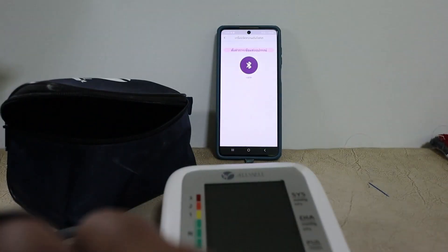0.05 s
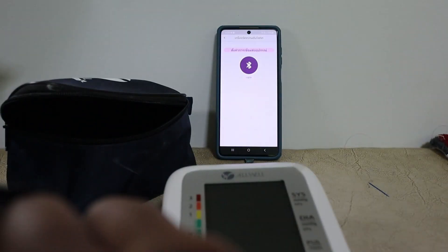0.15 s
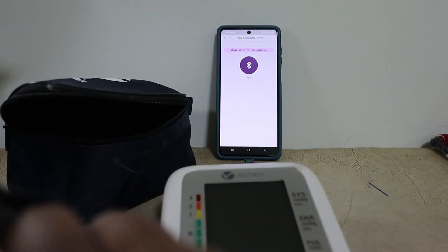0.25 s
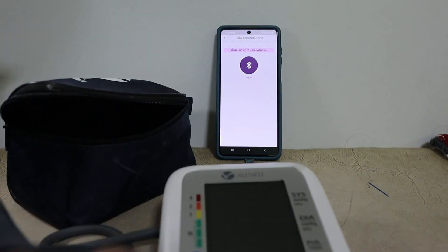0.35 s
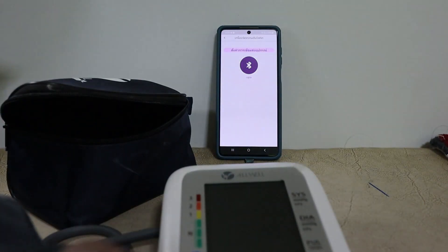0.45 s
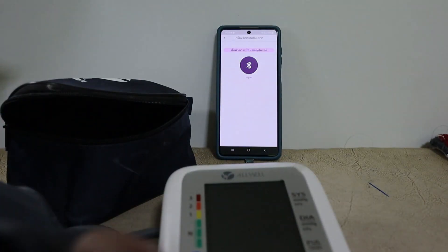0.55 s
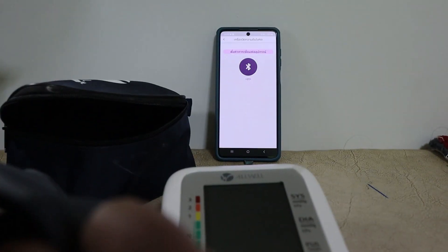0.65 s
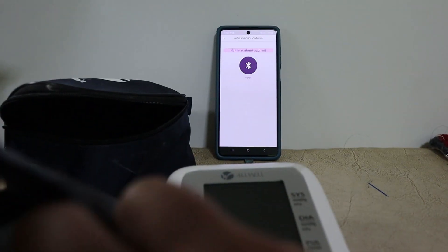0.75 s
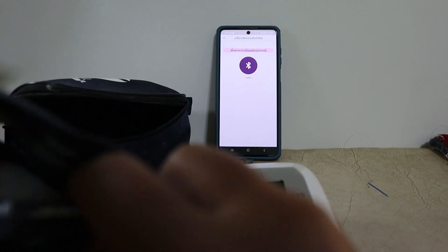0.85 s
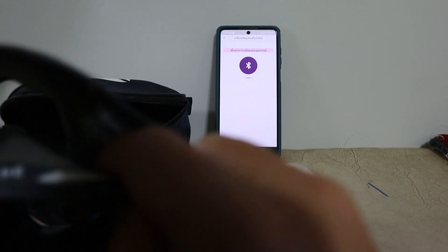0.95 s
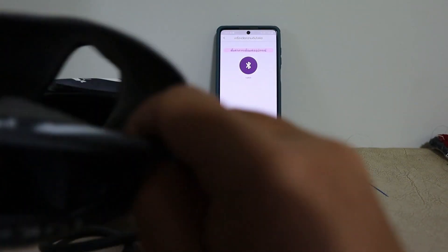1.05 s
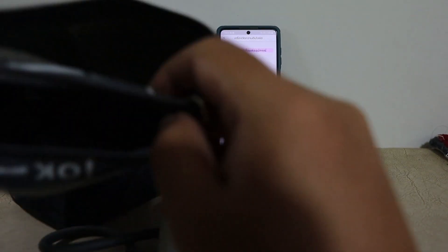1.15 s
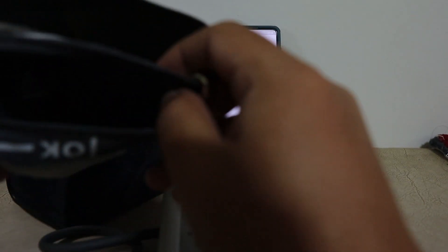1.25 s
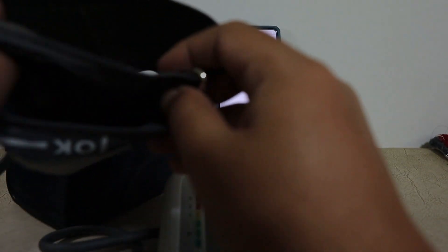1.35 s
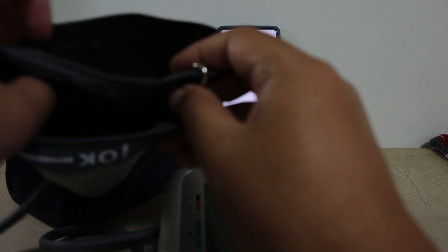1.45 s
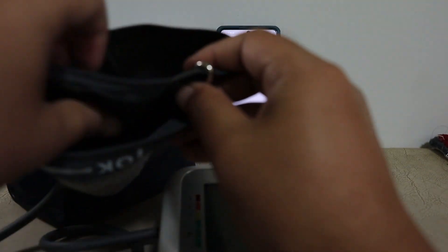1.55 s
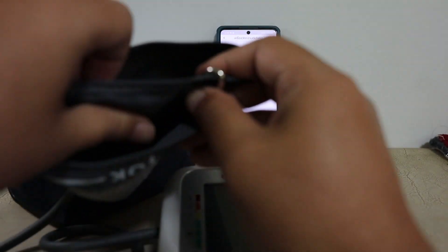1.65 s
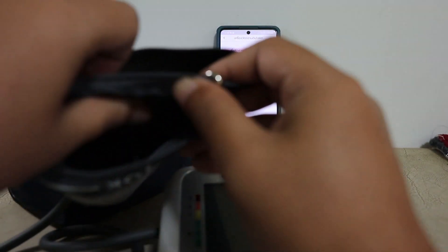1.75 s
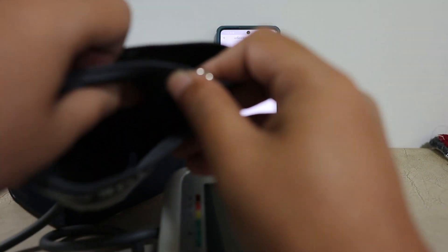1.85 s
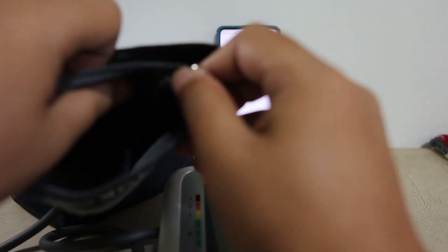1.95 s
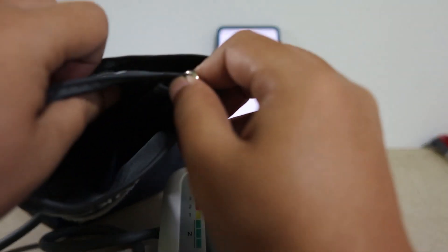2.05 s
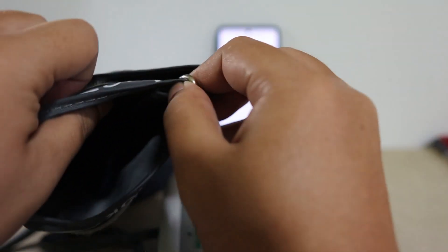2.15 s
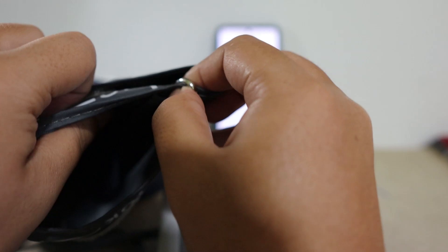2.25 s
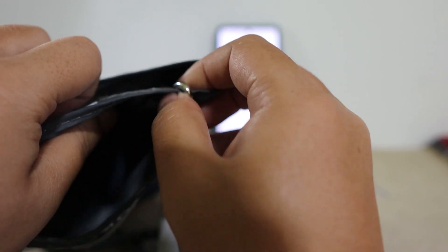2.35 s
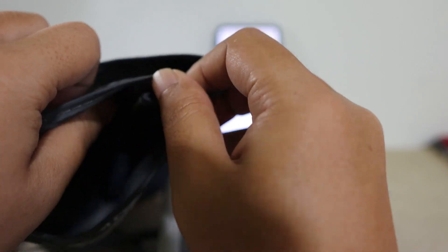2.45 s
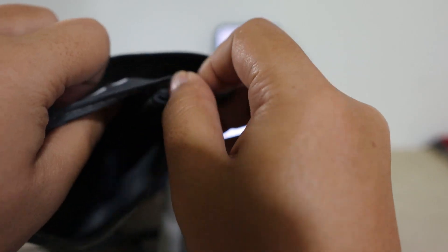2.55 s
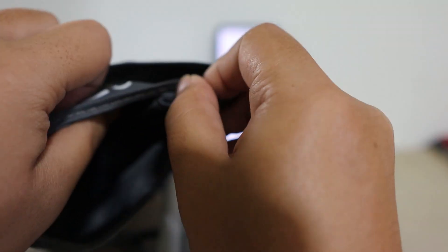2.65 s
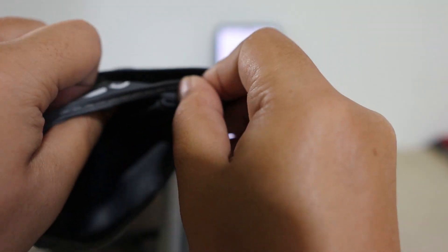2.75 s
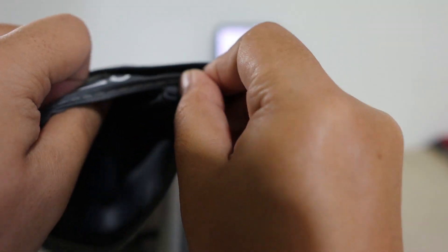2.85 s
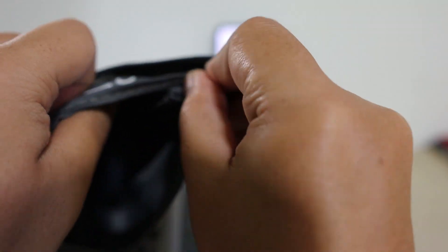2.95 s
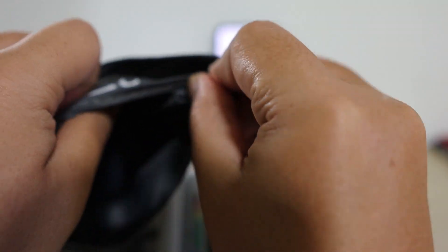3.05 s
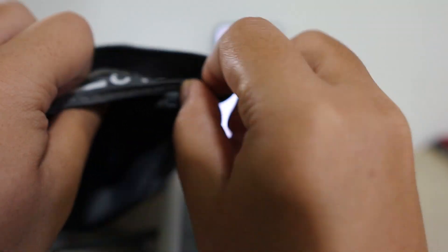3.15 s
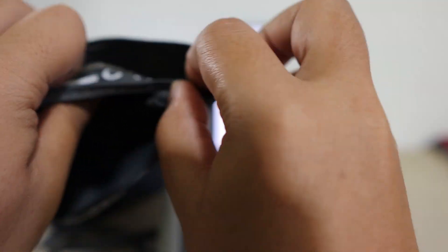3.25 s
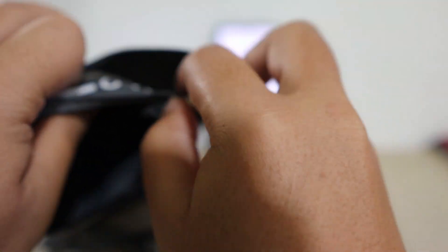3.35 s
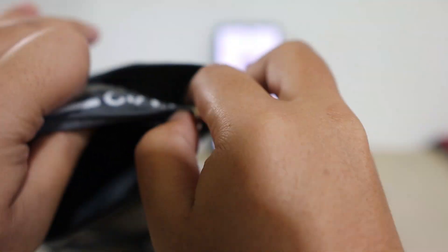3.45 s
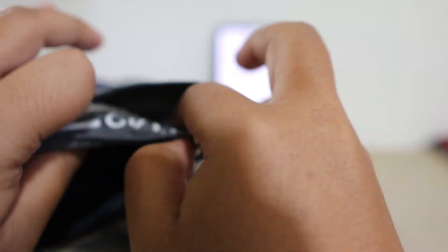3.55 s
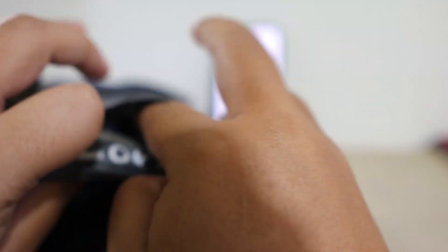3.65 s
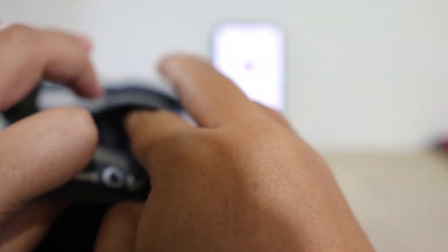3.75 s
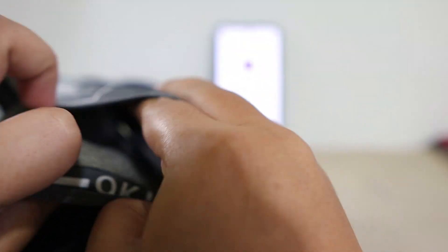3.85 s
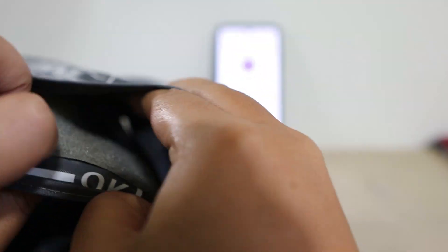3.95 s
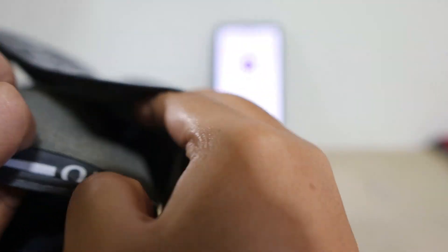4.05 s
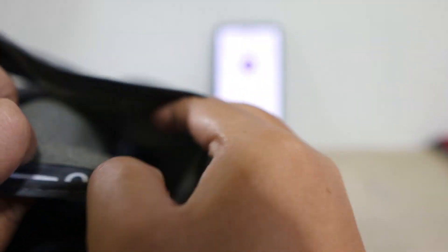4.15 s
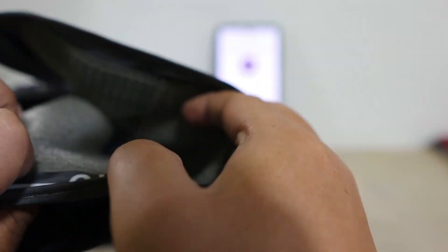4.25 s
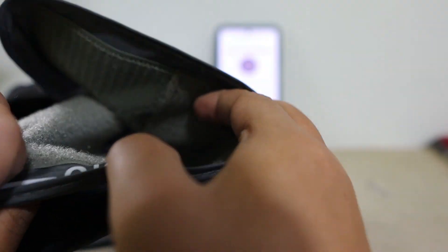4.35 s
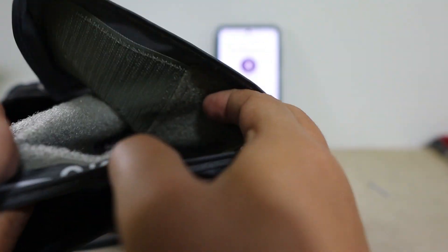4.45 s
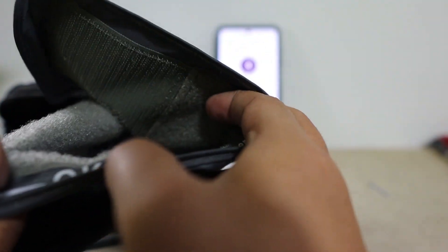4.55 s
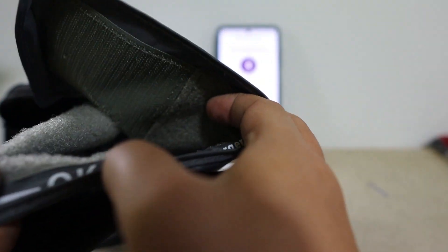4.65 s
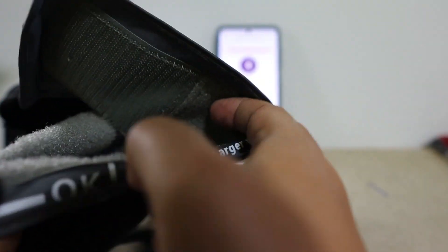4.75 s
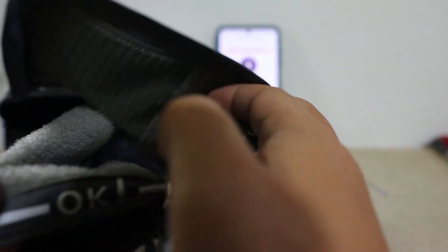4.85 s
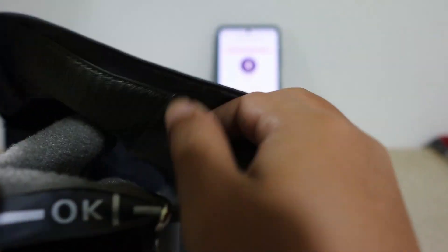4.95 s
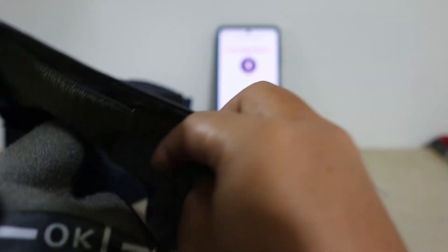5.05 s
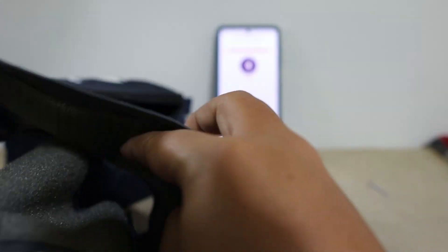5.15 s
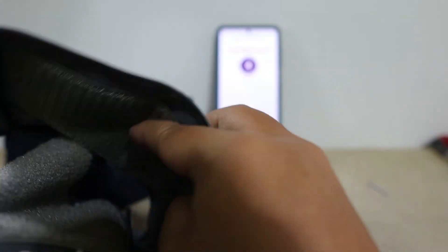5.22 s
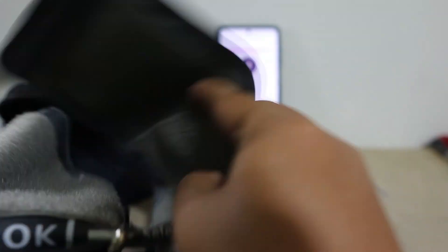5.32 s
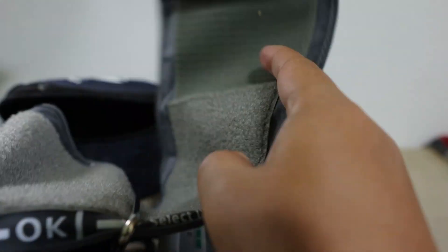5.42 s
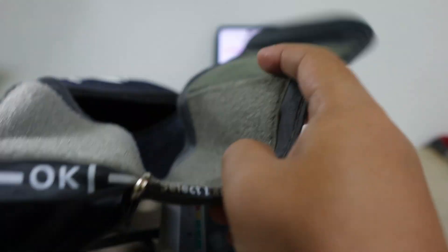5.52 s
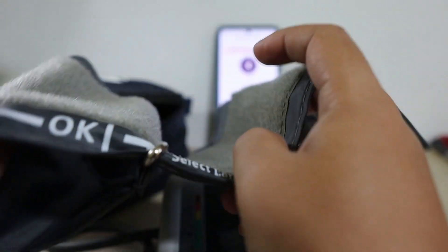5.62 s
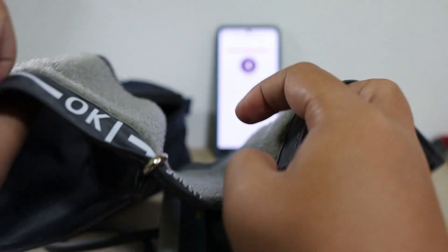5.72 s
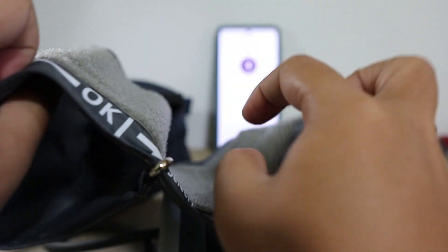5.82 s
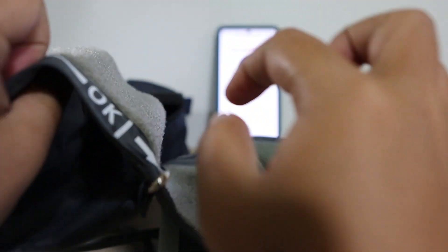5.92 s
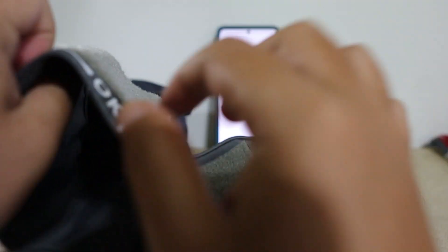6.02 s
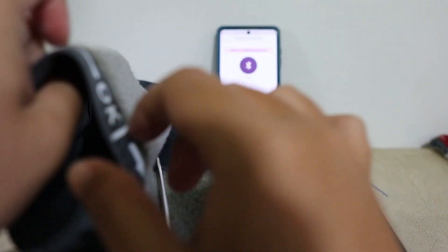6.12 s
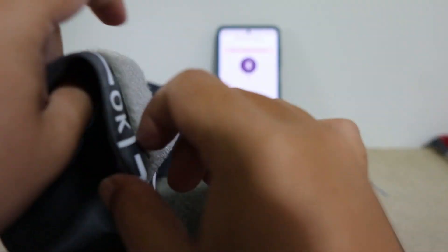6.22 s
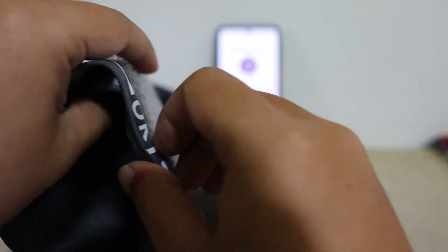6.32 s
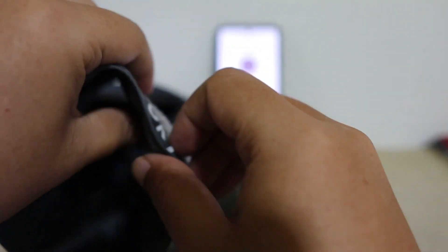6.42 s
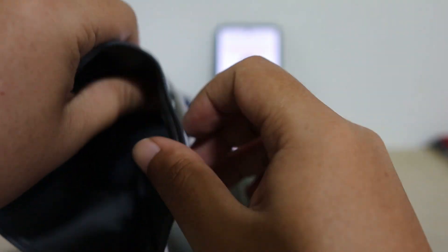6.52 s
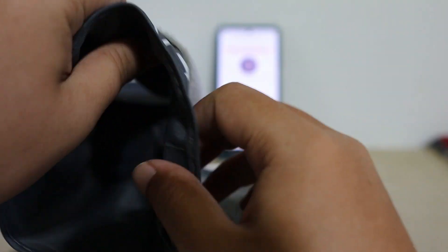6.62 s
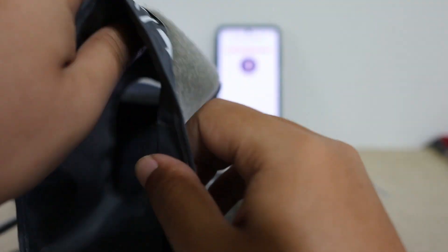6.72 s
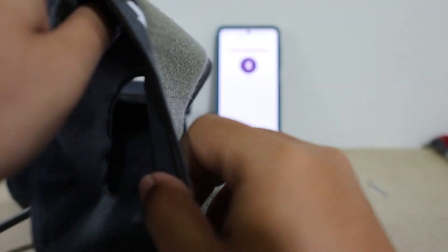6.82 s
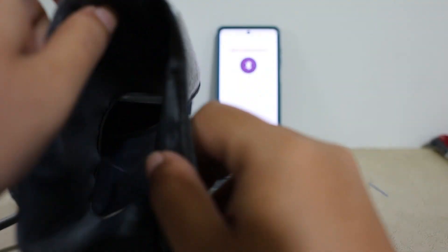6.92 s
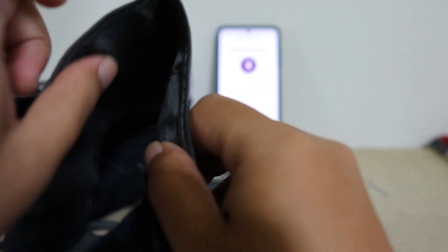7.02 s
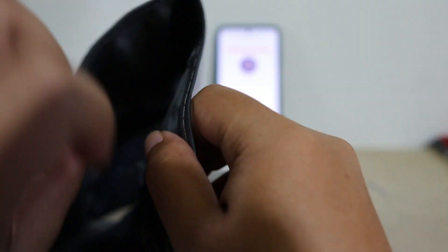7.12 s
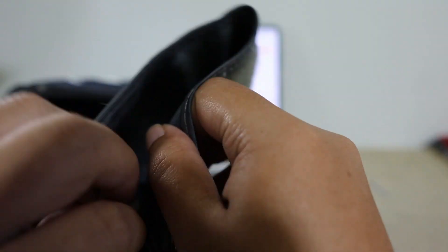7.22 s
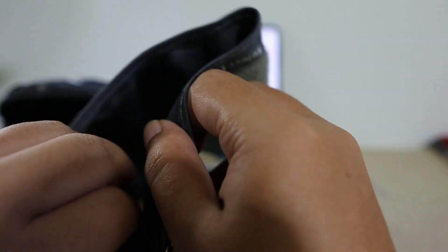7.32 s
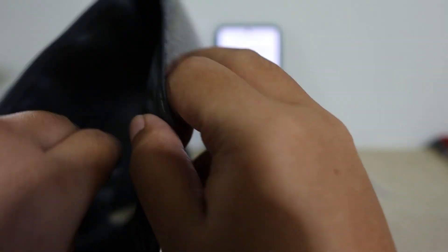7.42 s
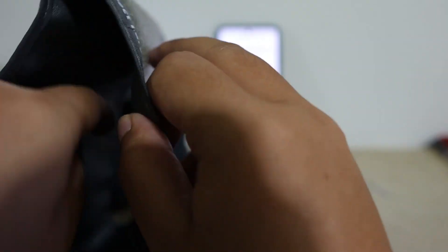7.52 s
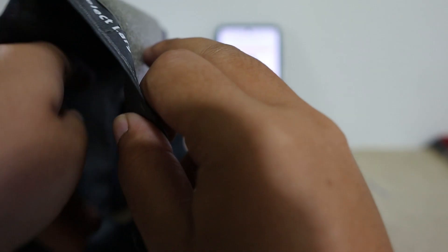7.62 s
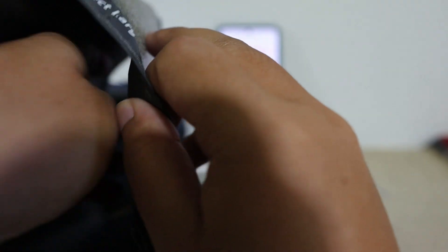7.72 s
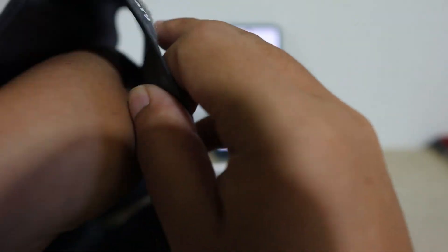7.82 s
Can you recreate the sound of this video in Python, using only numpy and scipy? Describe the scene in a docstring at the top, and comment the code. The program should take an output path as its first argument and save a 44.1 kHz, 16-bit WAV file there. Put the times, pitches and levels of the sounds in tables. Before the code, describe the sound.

Close cloth rustle and light fitting taps in a quiet room, a long crackling strap rip, a last sharp rip, then softer rustling.

```python
"""A quiet room, close to a small camera microphone: hands turn a padded fabric cuff.
Cloth rustles as noise and random grains under swelling strokes; fittings knock as decaying sines with noisy ticks.
The hook-and-loop strap tears open in short crackling bursts and single hooks snag as brief rings.
A thin bundle of sines glides once over low filtered-noise rumble and a fading two-band drone."""
import sys
import numpy as np
from scipy import signal
from scipy.fft import rfft, irfft
from scipy.io import wavfile
from scipy.ndimage import uniform_filter1d

SR = 44100
rng = np.random.default_rng(int(sys.argv[2]) if len(sys.argv) > 2 else 0)


def invert_db(level):
    """Linear amplitude ratio for a level in decibels (20 dB per decade), elementwise."""
    return 10 ** (np.asarray(level, dtype=float) / 20)


def wav_record(signal):
    """Record a signal, one row per channel, as 16-bit PCM in the file named by sys.argv[1]."""
    frames = np.transpose(np.atleast_2d(signal))
    bounded = np.clip(frames, -1, 1)
    # unit amplitude maps onto the largest positive 16-bit level
    quanta = np.round(bounded * 32767).astype(np.int16)
    wavfile.write(sys.argv[1], SR, quanta)


N = 347287

# edges between the bands that folds of cloth shade separately: (frequency [Hz])
FOLD_EDGES = (450, 850, 1400, 2500, 3400, 4600, 8000)


def rms_one(x):
    """Power normalisation: scale to rms 1."""
    return x / np.sqrt(np.mean(x ** 2) + 1e-20)


def in_time(rows):
    """Linear interpolation: columns of a curve table at every sample."""
    s, *columns = np.transpose(rows)
    return [np.interp(np.arange(N) / SR, s, column) for column in columns]


def coloured(x, spectrum):
    """Minimum-phase filtering: folding the cepstrum gives a causal response, here of unit energy."""
    hz, level_db = np.transpose(spectrum)
    grid = np.fft.rfftfreq(8192, 1 / SR) + 1   # +1 Hz keeps the logarithm finite
    log_gain = np.interp(np.log(grid), np.log(hz), level_db) * np.log(10) / 20
    cepstrum = irfft(log_gain)
    cepstrum[1:4096] *= 2
    cepstrum[4097:] = 0
    response = irfft(np.exp(rfft(cepstrum)))[:4096]
    return signal.fftconvolve(x, response / np.linalg.norm(response))[:N]


def half(x, kind):
    """Band splitting: the body ("low") or treble ("high") side of the spectral valley at 2 kHz."""
    return signal.sosfilt(signal.butter(4, 2000, kind, fs=SR, output="sos"), x)


def drift(rate):
    """Band-limited fluctuation: straight lines between normal random knots, rate knots per second."""
    knots = rng.standard_normal(5000)
    return np.interp(np.arange(N) / SR * rate, np.arange(len(knots)), knots)


def grains(per_s, spread_db):
    """Shot noise: random clicks of uneven size and sign, rms 1."""
    sizes = invert_db(spread_db * np.minimum(rng.exponential(1, N), 5))
    sizes = sizes * rng.choice([-1, 1], N)
    return rms_one(sizes * (rng.random(N) < per_s / SR))


def patchy(x, depth_db, rate, edges):
    """Acoustic shading: folds of cloth make each band between the edges swell and sink on its own."""
    below = [signal.sosfiltfilt(signal.butter(3, hz, fs=SR, output="sos"), x) for hz in edges]
    bands = zip([0] + below, below + [x])
    return sum((top - bottom) * invert_db(depth_db * drift(rate)) for bottom, top in bands)


def stroke_levels():
    """Exponential swell and decay: strokes rise and fall evenly in dB, and their powers add."""
    # cloth sliding on cloth: (peak time [s], body level [dB], hiss re body [dB], swell [s], fade [s])
    strokes = [(0.0, -49, -1.5, .05, 0.31), (0.218, -42, 2, 0.054, 0.072), (0.43, -61, 7.5, 0.092, 0.23),
               (0.6, -54, -2.5, 0.14, 0.29), (1.0, -50, 3, 0.1, 0.083), (1.13, -51, 2, 0.02, 0.081),
               (1.259, -42.5, 1.5, 0.12, 0.094), (1.582, -44, -6, 0.13, 0.15), (2.25, -59, -3, 0.97, 0.12),
               (2.55, -56, -6, 0.32, 0.42), (2.93, -51, -5, 0.065, 0.1), (3.22, -54.5, -1, 0.2, 0.12),
               (3.35, -51, 1, 0.11, 0.083), (3.46, -43.5, 0.5, 0.058, 0.079), (3.72, -59, -6.5, 0.98, 0.78),
               (3.92, -48.5, -11, 0.056, 0.2), (4.12, -52, 1.5, 0.31, 0.8), (4.93, -44, -1, 0.52, 0.043),
               (5.058, -50, 0.5, 0.078, 0.02), (5.17, -49.5, -0.5, 0.073, 0.25),
               (5.39, -46, 0.5, 0.11, 0.24), (5.55, -51, -6.5, 0.78, 0.15), (5.84, -53, 1.5, 0.027, 0.16),
               (6.09, -51.5, -6, 0.047, 0.11), (6.26, -61, 7, 0.12, 0.14), (6.73, -51.5, -1, 0.32, 0.35),
               (6.885, -53, 1, 0.13, 0.14), (7.07, -51, -1.5, 0.077, 0.11), (7.46, -50.5, 0, 0.05, 0.23),
               (7.55, -55.5, -3, 0.15, 0.17), (7.76, -50, -3, 0.05, 0.073), (7.83, -58.5, 10, 0.13, 0.34)]
    rest_body_db, rest_hiss_db = -74.5, -73   # cloth creaking in the grip between strokes
    range_db = 15   # gained over the swell, lost over the fade
    t = np.arange(0, N + 64, 64) / SR
    s, body_db, hiss_db, swell, fade = np.transpose(strokes)[:, :, None]
    before_peak = (s - t) / np.maximum(swell, .01)
    after_peak = (t - s) / np.maximum(fade, .01)
    lost_db = range_db * np.maximum(before_peak, after_peak)
    levels = []
    for peak_db, rest_db in ((body_db, rest_body_db), (body_db + hiss_db, rest_hiss_db)):
        power = np.sum(invert_db(peak_db - lost_db) ** 2, axis=0) + invert_db(rest_db) ** 2
        levels.append(np.interp(np.arange(N) / SR, t, 10 * np.log10(power)))
    return levels


def rustle():
    """Friction noise: fibres catch thousands of times a second, hand pressure flutters, stray hooks tick."""
    # colour of the cloth at the microphone: (frequency [Hz], relative power density [dB])
    cloth_colour = [(120, -21.5), (200, -9), (334, -4.5), (456, -2.5), (867, -1), (1060, 2.5),
                    (1500, -15.5), (2300, -17.5), (3400, -11), (6280, -16.5), (7680, -14.5), (12400, -20),
                    (14300, -22), (16000, -39)]
    body_db, hiss_db = stroke_levels()
    flutter = drift(60.)
    fibres = grains(5000., spread_db=4.5) + 0.5 * rng.standard_normal(N)
    stray = uniform_filter1d(np.abs(grains(90.0, spread_db=4.0)), size=70)
    sound = coloured(fibres, cloth_colour)
    body_gain = invert_db(body_db + 1.6 * flutter + 2.8 * drift(35.)) * (1 + 0.28 * stray)
    hiss_gain = invert_db(hiss_db + 1.6 * flutter + 0.8 * drift(90.)) * (1 + 0.4 * stray)
    body = rms_one(half(sound, "low")) * body_gain
    hiss = rms_one(half(sound, "high")) * hiss_gain
    return body + patchy(hiss, depth_db=3.0, rate=12., edges=FOLD_EDGES[3:])


def room_air():
    """Stationary broadband noise: random pressure coloured into a low rumble."""
    # colour of the room air: (frequency [Hz], relative power density [dB])
    air_colour = [(24, -35), (40, 16.5), (64, 0), (220, -6.5), (467, -13), (1070, -13.5), (1760, -22),
                  (3220, -52.5), (16000, -65)]
    air = invert_db(-55.0) * coloured(rng.standard_normal(N), air_colour)
    return signal.sosfilt(signal.butter(8, 39., "high", fs=SR, output="sos"), air)


def drone():
    """Narrow-band resonance: noise through two resonators an octave apart makes a far, unsteady drone."""
    # fading of the drone: (time [s], level of the lower band [dB])
    drone_levels = [(0, -55), (3, -62), (7.87, -70)]
    level_db, = in_time(drone_levels)
    low, octave = [signal.lfilter(*signal.iirpeak(hz, 6, SR), rng.standard_normal(N)) for hz in (69, 138)]
    return invert_db(level_db) * (rms_one(low) + 0.68 * rms_one(octave))


def room(x):
    """Diffuse reverberation: exponentially decaying noise, dull and partly different at each ear."""
    t60_s, level_db, wall_cut_hz = 0.23, -14.5, 6400
    t = np.arange(SR // 2) / SR
    tails = rng.standard_normal((2, len(t))) * invert_db(-60 * t / t60_s) * (t > .004)
    tails = signal.sosfilt(signal.butter(1, [220., wall_cut_hz], "band", fs=SR, output="sos"), tails)
    shared = tails[0] + 0.14 * tails[1] * np.array([[1], [-1]])
    response = shared / np.linalg.norm(tails[0])
    return invert_db(level_db) * signal.fftconvolve(x[None], response, axes=1)[:, :N]


def taps():
    """Impact excitation: a knock at its own pitch rings the padding near 1 kHz, with a tick near 3.5 kHz."""
    # fittings and stiff folds knocking: (time [s], strength [dB], pitch [Hz], tick re strength [dB])
    tap_rows = [(0.025, -42, 600, 21), (0.375, -25.5, 713, -12.5), (0.578, -24.5, 580, -16),
                (0.788, -29, 660, -13.5), (0.8993, -11, 990, -11.5), (1.176, -19.5, 590, -33),
                (1.756, -20, 755, -13), (1.936, -26.5, 820, -27), (2.129, -35, 1030, -14),
                (2.226, -29.5, 950, -10), (2.268, -28.5, 960, -31), (3.049, -34.5, 860, -29),
                (4.8728, 1, 1400, -6.5), (4.8725, -4, 2850, -19), (5.475, -0.5, 546, -5),
                (5.485, -1, 980, -23), (5.822, -39, 1150, 1.5), (6.052, -29, 570, 4),
                (6.106, -24, 587, -16), (6.713, -27.5, 770, -2), (6.715, -32, 1230, -1),
                (6.817, -36, 1300, -16), (6.866, -17, 1340, -18), (7.18, -29, 624, -37),
                (7.539, -30.5, 403, -22), (7.61, -35, 700, -12)]
    out, t = np.zeros(N + SR), np.arange(SR // 8) / SR
    chance = rng.standard_normal((len(tap_rows), len(t)))
    ring = 0.5 * np.sin(2 * np.pi * 1000 * t) * invert_db(-60 * t / 0.019)
    ring = ring + 0.073 * np.sin(2 * np.pi * 1150 * t) * invert_db(-60 * t / 0.062)
    for (s, strength_db, hz, tick_db), noise in zip(tap_rows, chance):
        knock = np.sin(2 * np.pi * hz * t) * invert_db(-60 * t * hz / 4.9)   # higher knocks die sooner
        near = 1 / (1 + ((hz - 1030.) / 150.) ** 2)   # knocks close to its pitch drive the padding hardest
        rise = 1 - np.exp(-t / (0.00059 + 0.0011 * near))
        tick = (np.sin(2 * np.pi * 3350 * t) + 0.9 * noise) * invert_db(-60 * t / 0.0055)
        body = 2.01 * rise * (knock + near * ring)
        at = round(s * SR)
        out[at:at + len(t)] += invert_db(strength_db) * (body + invert_db(tick_db) * half(tick, "high"))
    return signal.sosfilt(signal.butter(2, 6500., fs=SR, output="sos"), out[:N])


def snags():
    """Damped free vibration: single hooks snag with a few milliseconds of thin, high ring and crackle."""
    # hooks snagging: (time [s], level of the ring at its start [dB], pitch [Hz])
    snag_rows = [(0.785, -39.5, 9100), (1.856, -51, 10900), (2.3218, -46, 4160), (2.382, -46, 8930),
                 (2.925, -38, 4670), (3.305, -39, 7990), (3.328, -38, 7000), (3.378, -31, 9000),
                 (3.41, -36, 4970), (5.752, -43, 4320), (6.619, -54.5, 5130), (6.658, -41, 5070),
                 (6.677, -40, 4400), (6.699, -45.5, 4030)]
    t60_s, noise_share = 0.008, 0.66
    out, t = np.zeros(N), np.arange(SR // 40) / SR
    chance = rng.standard_normal((len(snag_rows), len(t)))
    for (s, level_db, hz), noise in zip(snag_rows, chance):
        at = round(s * SR)
        ring = np.sin(2 * np.pi * hz * t) + noise_share * half(noise, "high")
        out[at:at + len(t)] += invert_db(level_db - 60 * t / t60_s) * ring
    return signal.sosfilt(signal.butter(2, 11000., fs=SR, output="sos"), out)


def whine():
    """Frequency modulation: wavering strands glide together, and the top one takes over at the end."""
    # the glide: (time [s], main strand frequency [Hz], main strand level [dB], top strand level [dB])
    glide = [(3.04, 9000, -81, -90), (3.07, 10200, -67, -91), (3.1, 10900, -67, -82),
             (3.201, 11250, -63, -84), (3.28, 11700, -58, -79), (3.325, 11000, -63, -61),
             (3.43, 10750, -76, -57)]
    hz, main_db, top_db = in_time(glide)
    t = np.arange(N) / SR
    gate = np.clip(np.minimum(t - glide[0][0], glide[-1][0] - t) / .01, 0, 1)   # 10 ms ramps
    phase = 2 * np.pi * np.cumsum(hz * (1 + 0.004 * drift(70.))) / SR
    out = 0
    # frequency ratio and level of each strand
    for ratio, level_db in ((1, main_db), (.925, main_db - 8.), (.78, main_db - 9.), (1.125, top_db)):
        out = out + invert_db(level_db + 3.0 * drift(90.0)) * np.sin(ratio * phase)
    return gate * out


def small_runs(count):
    """Random point process: small runs of hooks strewn over the long pull, as (s, body dB, length ms)."""
    # strength of the small runs: (time [s], mean body level [dB])
    pull = [(3.921, -43.5), (4.151, -32.5), (4.22, -27.5), (4.26, -39.5), (4.45, -36.5), (4.58, -31.5),
            (4.7, -28), (4.929, -32.5)]
    mean_ms, spread_db = 4.5, 3.0
    when, size, length = rng.random((count, 3)).T
    pull_s, pull_db = np.transpose(pull)
    s = pull_s[0] + when * (pull_s[-1] - pull_s[0])
    body_db = np.interp(s, pull_s, pull_db) + spread_db * (2 * size - 1)
    return list(zip(s, body_db, mean_ms * (.5 + length)))


def strap():
    """Stick-slip release: runs of hooks start at once, crackle and stop; the padding booms near 1 kHz."""
    # single runs of hooks letting go, loud and faint: (time [s], body level [dB], length [ms])
    rips = [(3.359, -29.5, 8.1), (3.429, -28.5, 10.2), (3.439, -28.5, 10), (3.451, -33, 10),
            (3.606, -44.5, 4.7), (3.949, -41, 5.5), (3.983, -37, 6.5), (4.012, -44, 20), (4.056, -28, 2.7),
            (4.081, -37, 6), (4.141, -39, 4.7), (4.173, -32, 5.1), (4.185, -25.5, 8.1), (4.2, -29.5, 6.7),
            (4.217, -40, 2.4), (4.232, -45.5, 4.7), (4.271, -22.5, 2.3), (4.287, -24, 9.7),
            (4.296, -25, 12), (4.306, -26, 4.5), (4.325, -21.5, 20), (4.336, -20.5, 29), (4.395, -28, 22),
            (4.403, -18.5, 8.4), (4.413, -25.5, 6.6), (4.444, -21, 4.1), (4.461, -25.5, 1.8),
            (4.472, -20.5, 5.8), (4.479, -21, 3.9), (4.486, -21.5, 14), (4.508, -24, 3.2),
            (4.528, -38, 3.8), (4.552, -23.5, 21.4), (4.58, -28, 5.5), (4.594, -23, 4.2), (4.6, -24, 4.9),
            (4.617, -25, 3.3), (4.625, -23, 17.5), (4.643, -24.5, 7.7), (4.665, -24.5, 3.6),
            (4.686, -33, 6.6), (4.708, -36.5, 2.4), (4.719, -25.5, 7.1), (4.731, -25.5, 5.1),
            (4.749, -28.5, 6.6), (4.752, -25, 9.2), (4.762, -19.5, 7.5), (4.787, -19.5, 5.4),
            (4.807, -25.5, 15.6), (4.828, -20, 6.5), (4.841, -25.5, 12), (4.856, -18.5, 19.3),
            (4.879, -21, 17), (4.895, -30, 4.2), (4.914, -29.5, 6.2), (4.929, -44, 4.8), (5.171, -36, 4.4),
            (5.403, -22.5, 2.2), (5.409, -17.5, 3), (5.424, -20.5, 4.9), (5.433, -15.5, 6.4),
            (5.444, -26, 10), (5.453, -14, 31)]
    # changing brightness of the tear: bright bursts at first, dullest near 4.9 s, then brighter again:
    # (time [s], treble re body [dB])
    brightness = [(3.36, -1), (3.45, 1.5), (3.98, -4.5), (4.3, 1.5), (4.42, -4.5), (4.56, -3.5),
                  (4.66, -6.5), (4.73, -9), (4.91, -10), (5.4, -4.5), (5.47, -7)]
    # colours of the strap's middle and ends: (frequency [Hz], relative power density [dB])
    middle_colour = [(59, -31), (130, -19), (400, -11.5), (634, -10.5), (1060, 0), (1310, -14), (1650, -20),
                     (2220, -27), (3320, -10), (4290, -17.5), (7290, -18.5), (8830, -14), (10900, -24.5),
                     (12700, -18), (14400, -22), (16000, -61)]
    end_colour = [(35, -36), (60, -21), (150, -13.5), (323, -8), (380, -4), (767, -4), (1040, 1),
                  (1660, -29), (3120, -15.5), (3940, -18), (4970, -16), (13300, -25.5), (16000, -41.5)]

    body = np.zeros(N)
    for s, body_db, length_ms in rips + small_runs(count=50):
        t = np.arange(int(.08 * SR)) / SR * 1000 / max(length_ms, 1)   # in run lengths
        shape = (1 - np.exp(-t / .1)) * np.exp(-t ** 3)
        at = round(s * SR)
        body[at:at + len(t)] += shape * invert_db(body_db)
    treble = body * invert_db(in_time(brightness)[0])

    late = np.clip(drift(300.) - .6, 0, None)   # single hooks keep letting go after each run
    keep = np.exp(-1 / (0.03 * SR))   # 30 ms decay
    body, treble = [force + 1.5 * late * signal.lfilter([1 - keep], [1, -keep], force)
                    for force in (body, treble)]

    hooks = grains(7000., spread_db=1.6) * invert_db(1.5 * drift(450.))
    hooks = hooks + .35 * rng.standard_normal(N)
    t = np.arange(N) / SR
    middle = (t > 3.7) & (t < 5.3)   # the long pull; the ends of the strap sound deeper
    out = 0
    for part, colour in ((middle, middle_colour), (~middle, end_colour)):
        for force, kind in ((body, "low"), (treble, "high")):
            steady_rms = np.std(half(coloured(hooks, colour), kind))
            out = out + half(coloured(hooks * force * part, colour), kind) / steady_rms
    return patchy(out, depth_db=2.5, rate=60., edges=FOLD_EDGES)


def scene():
    """Superposition: cuff a touch to the right, reflections and air; the ports differ most in the mid range."""
    cuff = rustle() + strap() + taps() + snags()
    air = room_air() + drone()
    direct = cuff * invert_db(0.9 * np.array([[-1], [1]]))
    left, right = direct + room(cuff)
    side = signal.sosfilt(signal.butter(1, 350., "high", fs=SR, output="sos"), left - right) / 2
    side = 0.59 * side + 0.2 * signal.lfilter(*signal.butter(1, 2500., fs=SR), side)
    mid = (left + right) / 2 + air + whine()
    return np.array([mid + side, mid - side])


def top_cut(x):
    """Nothing passes above the cut-off."""
    return signal.sosfilt(signal.butter(12, 15900, fs=SR, output="sos"), x)


def record(dry):
    """Soft saturation: the input stage rounds the highest peaks."""
    mix = 0.88 * np.tanh(dry / 0.92)
    return top_cut(mix)


dry = scene()
out = record(dry)
wav_record(out)
```